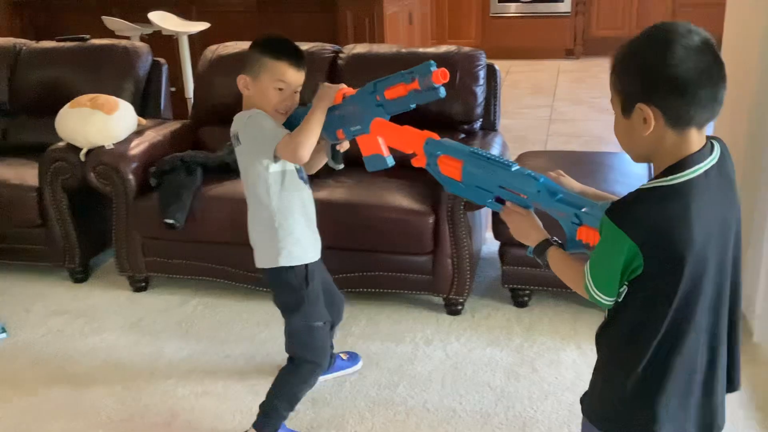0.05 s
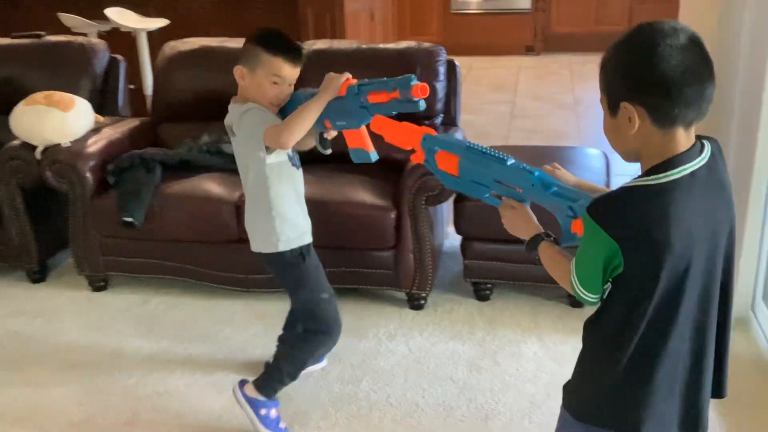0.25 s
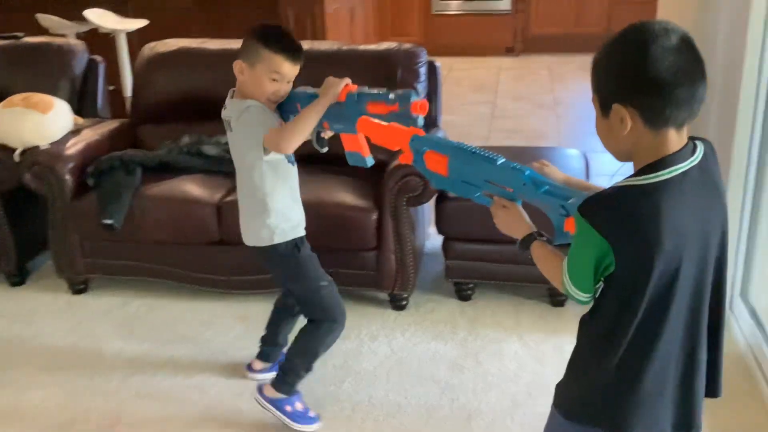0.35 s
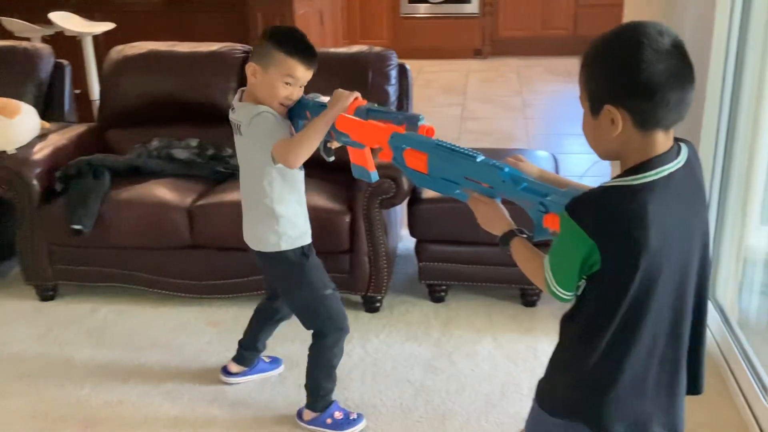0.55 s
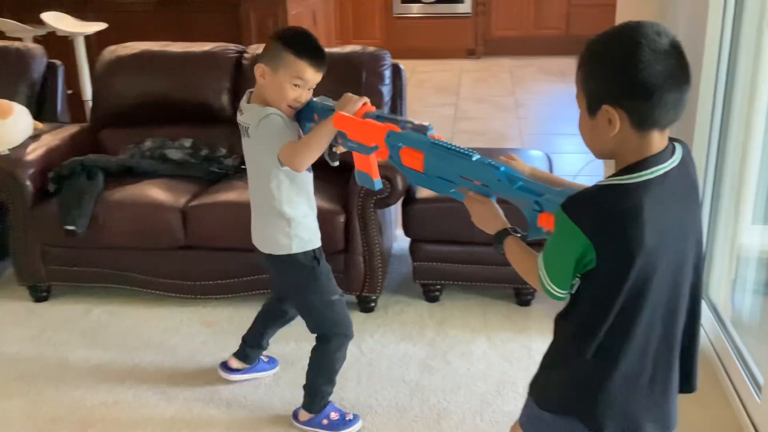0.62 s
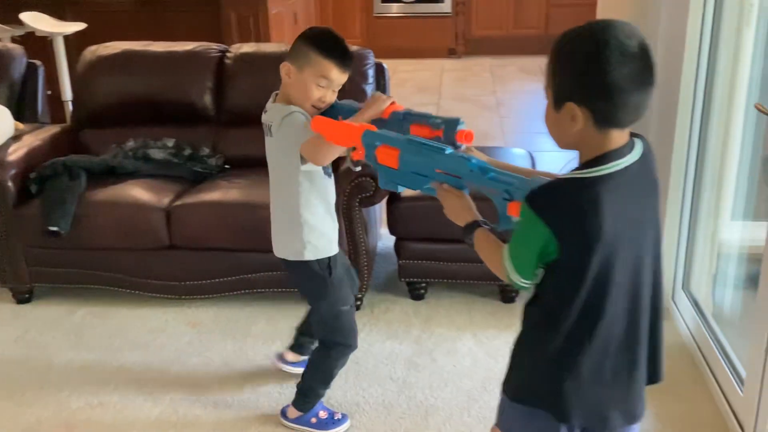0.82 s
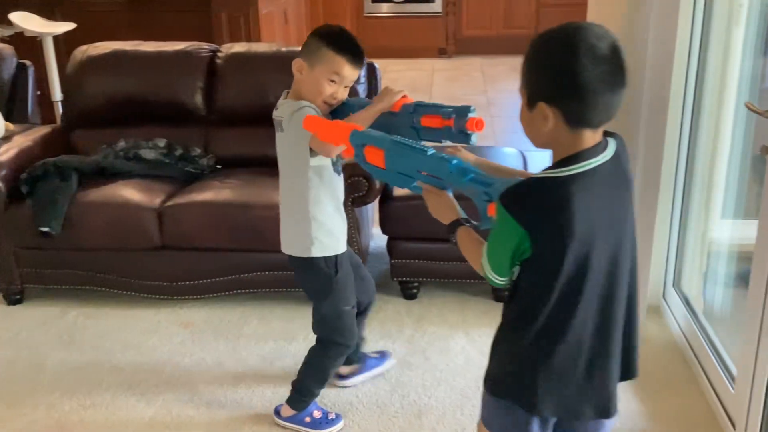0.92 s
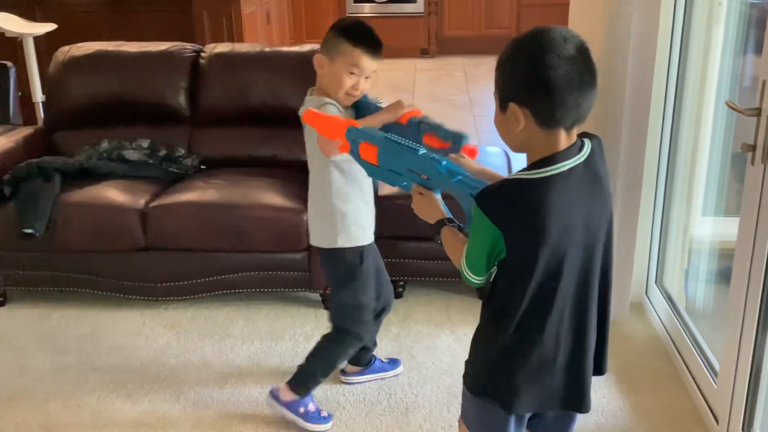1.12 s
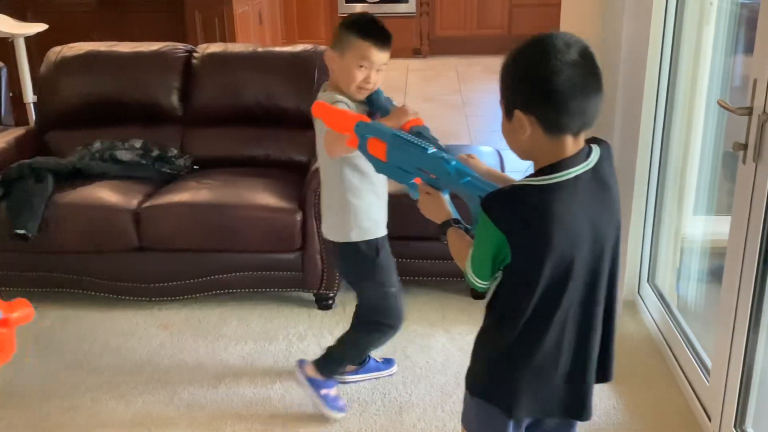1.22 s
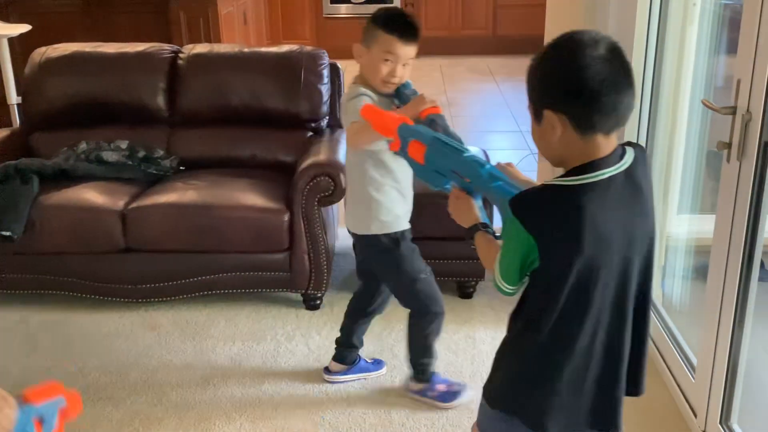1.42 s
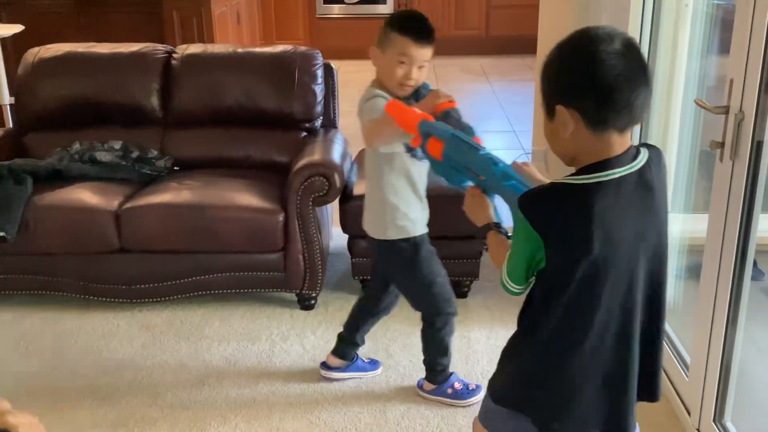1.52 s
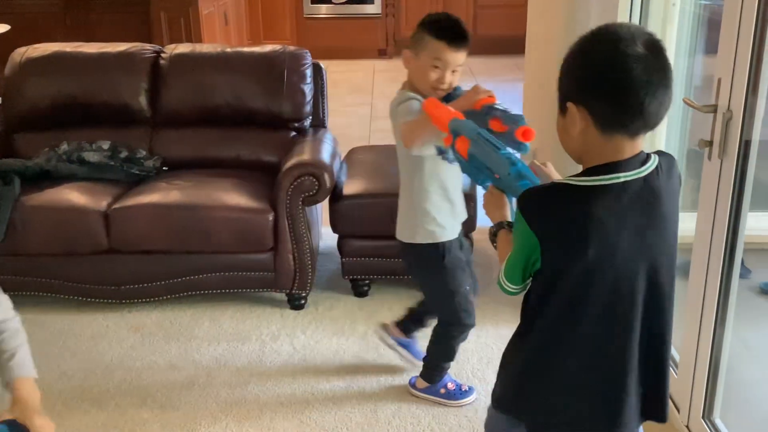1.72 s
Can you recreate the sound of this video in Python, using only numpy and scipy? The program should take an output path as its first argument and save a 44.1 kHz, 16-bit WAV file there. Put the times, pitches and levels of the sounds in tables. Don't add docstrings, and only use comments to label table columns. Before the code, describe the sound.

Two hard bursts of hollow plastic slide clacks from toy blasters, with light rattles and room echo.

```python
import sys
import numpy as np
from scipy import signal
from scipy.io import wavfile

SR = 44100
rng = np.random.default_rng(int(sys.argv[2]) if len(sys.argv) > 2 else 0)


def pcm_store(signal):
    levels = np.round(np.clip(np.atleast_2d(signal), -1, 1) * 32767)
    wavfile.write(sys.argv[1], SR, levels.astype(np.int16).T)


def undo_db(level):
    steps = np.asarray(level, float) / 20
    return 10 ** steps


N = 77175
LEAD = 16384
RATTLE = 4096

# start_s, level_db (rms over the rattle length), colour_hz, rattle_ms,
# room_send_db
SLIDE_SLAMS = [(.2065, -10, 2550, 2.37, -6), (.2105, -6, 2300, 1.41, -4.5), (.2348, -1.5, 1570, 1.2, -13),
               (.260, -19.5, 1480, 3.5, 1.5), (.7685, -8, 5500, 1.1, -25), (.777, -8, 2780, 1.06, -1.5),
               (.789, -11, 2700, 1.79, -7.5), (.8043, -3.5, 3060, 1.3, -10), (.824, -15, 1510, 1.47, -6),
               (.839, -25, 2610, 3.0, 6), (.2165, -12, 3500, 3.26, -8.5), (.225, -16, 2220, 3.2, -9.5),
               (.243, -18.5, 2570, 4.0, -6), (1.337, -19, 2500, 1.91, -6.5), (1.342, -22, 2840, 2, -11.5),
               (1.386, -33, 800, 4.0, -10.5)]
# start_s, level_db (rms over the rattle length), colour_hz, rattle_ms,
# room_send_db
LATCH_TICKS = [(.0945, -28, 5300, 4.5, -17), (.111, -40, 2020, 2.0, -14), (.148, -33.5, 4860, 2.5, -19),
               (0.155, -34, 894, 4.4, -0.5), (.167, -26.5, 1570, 4.7, -19), (.185, -27, 1720, 3, -1),
               (.4195, -23.5, 4167, 1.5, -26), (.574, -32, 2830, 2.2, -10), (.588, -41, 2020, 2.3, -15),
               (.593, -27.5, 1780, 2.2, -9), (.700, -33.5, 5900, 0.76, -10),
               (.7025, -26, 1660, 2.36, -10.5), (.7235, -27, 1720, 1.58, 4), (1.217, -39, 2500, 3.5, -26),
               (1.228, -28, 2060, 2.55, -8), (1.234, -47, 5710, 5.1, -4), (1.316, -39, 6000, 1.5, -21),
               (1.688, -43.5, 734, 5.4, -1.5), (1.723, -47, 6900, 6.1, -6)]
# start_s, level_db (rms over the rattle length), colour_hz, rattle_ms,
# room_send_db
EARLIER_SLAM = [
    (-0.2, -8, 1780, 5.02, -3.5),
]
# start_s, level_db (rms over the rattle length), panel_hz, rattle_ms, room_send_db
PANEL_KNOCKS = [(.095, -29, 5300, 2.5, -13), (.219, -7, 820.6, 2.0, -15.5), (.2312, -5.5, 950, 1.4, -16.5),
                (.289, -12.5, 5000, 1.5, -9.5), (.424, -27, 5300, 2.5, -21), (.553, -39, 5050, 3.0, -9),
                (.596, -26.5, 990, 1.5, -9), (.222, -16.5, 591, 2.47, -11), (.169, -26, 1800, 1.5, -10),
                (.725, -22.5, 585, 1.97, -17), (.734, -23.5, 577, 1.74, -30), (.7715, -3.5, 4600, 1.0, -13),
                (.785, -12, 1420, 1.0, -7), (.7945, -22, 444, 2.5, -21), (.8055, -27, 5570, .8, 0),
                (.806, -16, 774, 1.8, -17), (1.148, -27, 1690, 2.0, -7.5), (1.149, -39, 2110, 2.0, -11),
                (1.230, -33.5, 840, 2.12, -10), (1.343, -15, 1190, 1.5, -16),
                (1.342, -15.5, 578, 2.2, -21.5), (1.68, -36, 1780, 1.37, -4)]
# pitch_hz, level_db, t60_s
SHELL_MODES = [(603, -3.5, 0.064), (850, -7.5, 0.047), (1190, -1.5, 0.065), (1544, -1, 0.048),
               (2090, -5, 0.0071), (2913, 1.5, 0.06), (3780, 5, .02), (4600, -61, 0.0077), (5300, -8, 0.03),
               (7800, 23, 0.005), (9350, 3, 0.02)]
# slam (0 first, 1 second), level_db, pitch_hz, t60_s
PLUNGER_THUMPS = [
    (0, -36, 272, 0.047),
    (0, -39, 96, 0.1),
    (1, -26, 243, 0.16),
    (1, -24, 302, 0.089),
    (1, -43, 144, 0.16),
    (1, -46, 75.6, 0.1),
]
# pitch_hz, t60_s
ROOM_DECAY = [(100, 1), (300, 0.79), (700, 0.7), (1800, 0.8), (4800, 0.88), (8000, 0.62), (14000, 0.44)]
# pitch_hz, level_db
ROOM_TONE = [(100, 17), (300, 1), (700, -0.5), (2000, -7.5), (5000, -6.5), (8000, 0.5), (14000, -2.5)]
# pitch_hz, level_db (per Hz)
HOUSE_TONE = [(24, -37), (40, -6), (359, -10), (881, -4.5), (2270, -6), (2510, 1), (3740, -20.5),
              (7340, -19.5), (15500, -33)]
# time_s, level_db
CARPET_SHUFFLE = [
    (1.675, -63),
    (1.685, -51),
    (1.72, -45),
    (1.75, -45),
]

COLOUR_Q, CRACK_DB = 1.35, -5.5
KNOCK_Q, KNOCK_CRACK_DB, KNOCK_LEAD = 5.0, -26, 1.3


def at_hz(points, hz):
    pitch_hz, value = np.transpose(points)
    return np.interp(np.log(hz), np.log(pitch_hz), value)


def ring(x, hz, t60_s):
    radius, angle = undo_db(-60 / (t60_s * SR)), 2 * np.pi * hz / SR
    return signal.lfilter([0, np.sin(angle)], [1, -2 * radius * np.cos(angle), radius ** 2], x + 1e-18)


def band(low_hz, high_hz, noise):
    return signal.sosfilt(signal.butter(2, [low_hz, high_hz], "band", fs=SR, output="sos"), noise)


def bands(size):
    edges = 25 * 2 ** np.arange(0, 9.5, 1 / 3)
    white = rng.standard_normal((2, size))
    return [(np.sqrt(low * high), band(low, high, white[k % 2]))
            for k, (low, high) in enumerate(zip(edges, edges[1:]))]


def house_noise():
    noise = sum(undo_db(at_hz(HOUSE_TONE, hz)) * part for hz, part in bands(N))
    return undo_db(-49) * noise / noise.std()


def drone():
    hum_hz, hum_db, from_s, to_s = 137, -61, 1.53, 1.645
    t = np.arange(N) / SR
    fade = np.clip(np.minimum(t - from_s, to_s - t) / 0.01, 0, 1)
    return undo_db(hum_db) * np.sin(2 * np.pi * hum_hz * t) * fade


def carpet_shuffle():
    rub = band(550, 3000, rng.standard_normal(N))
    time_s, level_db = np.transpose(CARPET_SHUFFLE)
    return 2 * rub * undo_db(np.interp(np.arange(N) / SR, time_s, level_db, left=-120))


def room(x):
    rise_s, early_db, early_t60_s = 0.0022, 13, 0.04
    t = np.arange(SR) / SR
    early = undo_db(early_db - 60 * t / early_t60_s)
    tail = np.zeros(SR)
    for hz, part in bands(SR):
        late = undo_db(-60 * t / at_hz(ROOM_DECAY, hz))
        tail += undo_db(at_hz(ROOM_TONE, hz)) * part * (late + early)
    tail *= 0.049 * (1 - np.exp(-t / rise_s))
    return signal.fftconvolve(x, tail)[:len(x)]


def thumps():
    out = np.zeros(N)
    for slam, level_db, hz, t60_s in PLUNGER_THUMPS:
        start_s = 0.787 if slam > 0.5 else 0.224
        click = np.zeros(N)
        click[int(start_s * SR)] = undo_db(level_db)
        soft_push = signal.lfilter([0.0025], [1, -1.9, 0.9025], click)
        out += ring(soft_push, hz, t60_s)
    return out


def rattle(length_ms, lead):
    clicks_per_s, spread_db = 18000, 2.5
    size_draw, sign_draw, gate_draw = rng.random((3, RATTLE))
    u = np.arange(RATTLE) / SR * 1000 / length_ms
    sizes = undo_db(-spread_db * np.log(size_draw + 0.0033)) * np.sign(sign_draw - 0.5)
    gate = np.clip((clicks_per_s / SR - gate_draw) * 50, 0, 1)
    clicks = sizes * gate * u * np.exp(1 - u)
    clicks[int(length_ms * SR / 2000)] += lead * np.sqrt(np.sum(clicks ** 2))
    return clicks


def shell(clicks, hz):
    scatter_db, follows_db = 3.0, 7
    out = np.zeros(RATTLE)
    for mode_hz, level_db, t60_s in SHELL_MODES:
        scatter = scatter_db * 3.7 * (rng.random() - 2.0)
        distance = abs(np.log2(mode_hz / hz))
        out += undo_db(level_db + scatter - follows_db * distance) * ring(clicks, mode_hz, t60_s)
    return out


def contact(level_db, hz, length_ms, q, crack_db, lead):
    length = length_ms * SR / 1000
    clicks = rattle(length_ms, lead)
    single = np.arange(RATTLE) == int(length)
    crack_filter = signal.butter(1, min(6.1 * hz, 19000), fs=SR)
    heard = []
    for source, sharpness in [(clicks, q), (single, min(q, 2))]:
        colour = signal.lfilter(*signal.iirpeak(hz, sharpness, fs=SR), source)
        crack = signal.lfilter(*crack_filter, source)
        heard.append(2 * colour + undo_db(crack_db) * crack)
    out = np.array(heard)
    out[0] += undo_db(-21 + (crack_db - CRACK_DB) / 2) * shell(clicks, hz)
    return undo_db(level_db) * out / np.sqrt(np.sum(out ** 2, axis=1, keepdims=True) / length)


def blasters():
    dry, send = np.zeros((2, N + LEAD + RATTLE))
    broad = [*SLIDE_SLAMS, *LATCH_TICKS, *EARLIER_SLAM]
    for rows, *kind in [(broad, COLOUR_Q, CRACK_DB, 0),
                        (PANEL_KNOCKS, KNOCK_Q, KNOCK_CRACK_DB, KNOCK_LEAD)]:
        for start_s, level_db, hz, length_ms, send_db in rows:
            i = LEAD + int(start_s * SR)
            direct, mean_colour = contact(level_db, hz, length_ms, *kind)
            dry[i:i + RATTLE] += direct
            send[i:i + RATTLE] += undo_db(send_db + 1.5) * mean_colour
    return dry, send


def microphone(x):
    x = signal.sosfilt(signal.butter(4, 430, "high", fs=SR, output="sos"), x) + 0.025 * x
    return signal.sosfilt(signal.butter(2, 11400, fs=SR, output="sos"), x)


def port(x):
    step_hz, step = 6080, undo_db(-6)
    edges = [0, step_hz, step_hz * 1.04, step_hz * 1.2, SR / 2]
    gains = [1, 1, step, np.sqrt(step), np.sqrt(step)]
    return signal.fftconvolve(x, signal.firwin2(129, edges, gains, fs=SR), "same")


def scene():
    dry, send = blasters()
    contacts = microphone(dry + room(send))[LEAD:LEAD + N]
    house = house_noise() + drone() + carpet_shuffle()
    return port(contacts + thumps() + house)[None]


def band_limit(x):
    return signal.sosfilt(signal.butter(12, 16330, fs=SR, output="sos"), x)


def record(dry):
    clip_top = 0.95
    x = clip_top * np.tanh(dry / clip_top)
    x = signal.sosfilt(signal.butter(3, 69, "high", fs=SR, output="sos"), x)
    x = signal.sosfilt(signal.cheby2(14, 60, 16300, fs=SR, output="sos"), x)
    return band_limit(x)


dry = scene()
out = record(dry)
pcm_store(out)
```